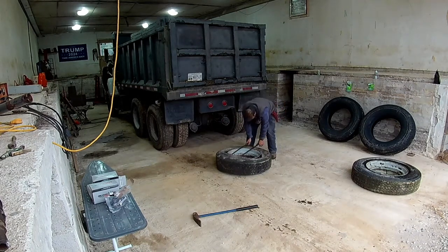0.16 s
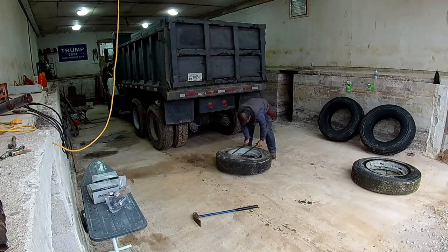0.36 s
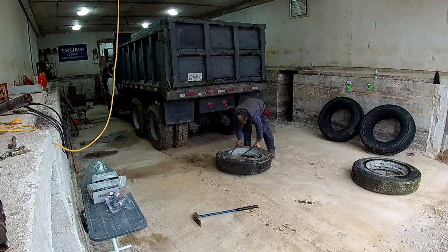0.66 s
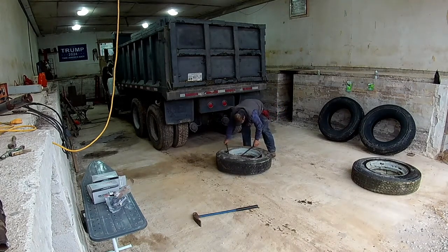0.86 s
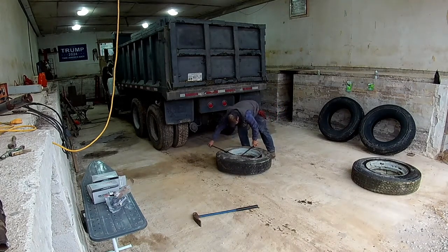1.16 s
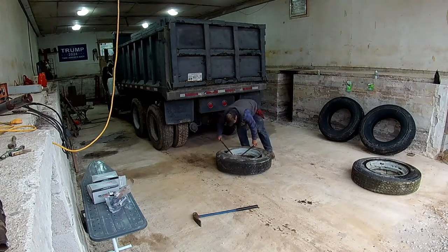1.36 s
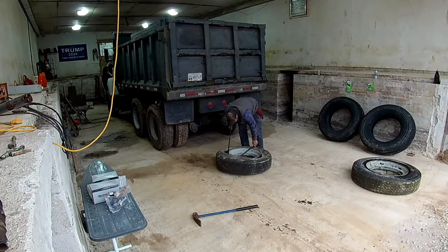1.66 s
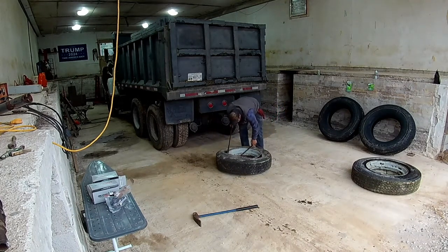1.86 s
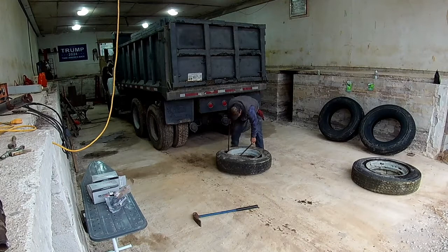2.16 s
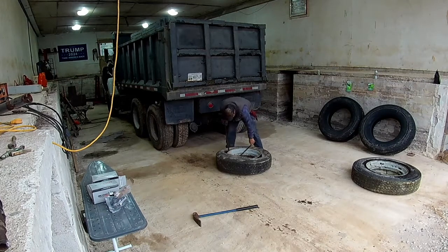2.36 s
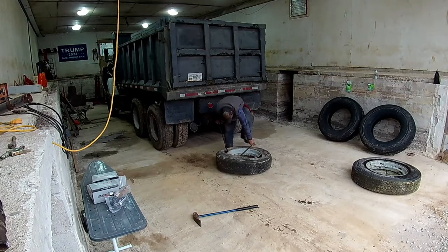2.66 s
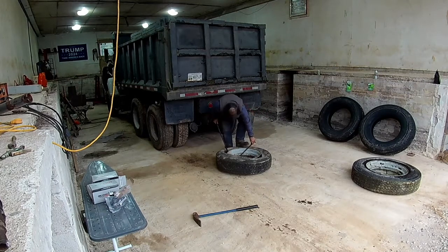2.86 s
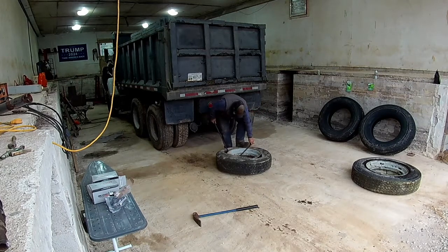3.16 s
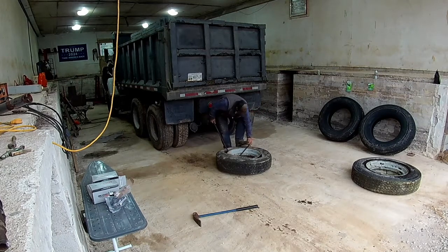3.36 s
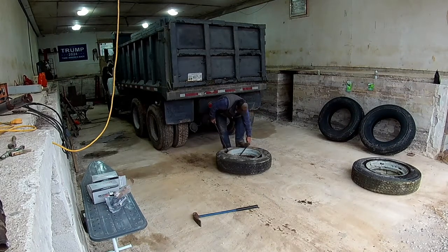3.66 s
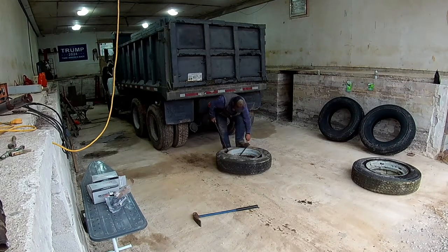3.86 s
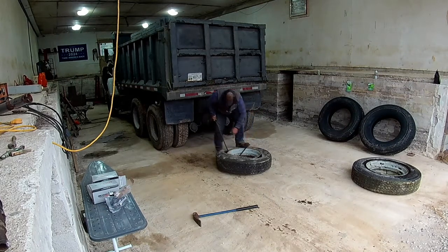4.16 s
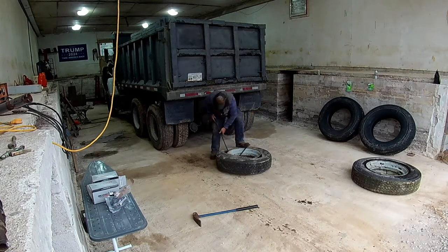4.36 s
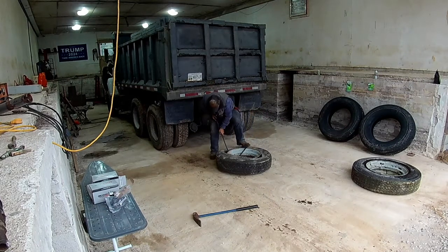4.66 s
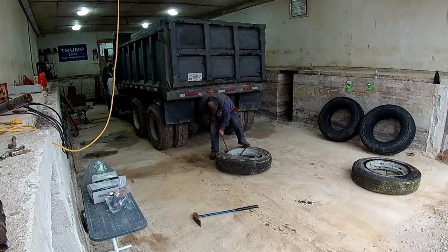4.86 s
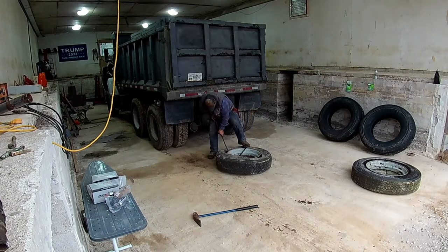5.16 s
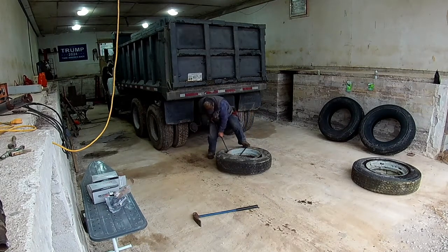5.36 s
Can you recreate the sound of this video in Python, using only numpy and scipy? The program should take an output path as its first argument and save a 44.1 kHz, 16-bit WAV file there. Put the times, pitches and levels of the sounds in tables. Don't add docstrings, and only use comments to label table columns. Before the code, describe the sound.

A large, hard-walled workshop heard from a distance, with steady low rumble and slight hiss. Soft, dull tire thumps come in the first 0.3 seconds. At about 0.7 a hard steel clank on the rim edge rings out with a wavering metallic tone and a drum-like tire boom. Around 1.05 a loose iron clinks lightly, at 1.3 it slips with a small knock, and at 1.55 it falls to the concrete with a bright double clatter and thud. A damped, hand-held iron clanks at 2.4, low soft bumps and a scuff pass near 2.8, and a faint tap comes at 3.2. At 3.6 the wheel's well is struck, a fuller hollow clank with a humming tail. Only a weak bump and faint creaking follow at 4.3, then near quiet until a heavy, deep thud with a short muted rim ring at 5.3, fading into the bay.

```python
import sys
import numpy as np
from scipy import signal
from scipy.fft import rfft, irfft
from scipy.io import wavfile
from scipy.ndimage import uniform_filter1d

SR = 44100
rng = np.random.default_rng(int(sys.argv[2]) if len(sys.argv) > 2 else 0)


def generate_wav(sig):
    pcm = np.round(np.clip(np.atleast_2d(sig).T, -1, 1) * 32767).astype(np.int16)
    wavfile.write(sys.argv[1], SR, pcm)


def gain_from_db(level_db):
    decades = np.asarray(level_db, float) / 20
    return 10 ** decades


N = 243873

# start_s, level_db, weight_db (lows), hardness_db (highs), length_s
CRACKS = [(0.0, -57, 8, -5, 0.027), (0.164, -47.5, 15, -14.5, 0.033), (0.662, -12, -9, -34, 0.0099),
          (0.676, -14.5, -12.5, -34.5, 0.017), (1.027, -39, -25, -16.5, 0.062),
          (1.057, -28, -10, -18, 0.011), (1.262, -30, -4, -53, 0.011), (1.54, -16.5, -7.5, -36, 0.0053),
          (1.556, -17.5, -7, -18, 0.0093), (2.421, -25.5, -15, -23.5, 0.01),
          (3.181, -50.5, -7.5, -17.5, 0.042), (3.577, -16, -12.5, -55, 0.011),
          (4.304, -43, -1.5, -59, 0.056), (5.331, -30.5, -1, -22.5, 0.034)]
# start_s, peak_db, drum_pitch_hz, side_wall_knock_db
THUDS = [(0.073, -56, 71, -31), (0.105, -30, 71.5, -44.5), (0.164, -28.5, 165, -25), (0.191, -20, 128, -41),
         (0.292, -57.5, 132, -42.5), (0.663, -22, 139.1, -24.5), (1.002, -40, 115, -29),
         (1.033, -31, 112, -27), (1.073, -34, 171.8, -33), (1.174, -44.5, 170.5, -69),
         (1.544, -20.5, 127, -15.5), (1.582, -20, 180, -66), (1.86, -49.5, 128, -47),
         (2.279, -44.5, 115, -36.5), (2.746, -35.5, 100.7, -36.5), (2.84, -40.5, 90.4, -42),
         (2.897, -39.5, 141, -56), (2.922, -48, 125, -73), (3.192, -45, 130, -42),
         (3.583, -33.5, 130, -50.5), (3.6, -38.5, 194.4, -62.5), (4.309, -64, 130, -26.5),
         (4.848, -45, 99, -68), (5.337, -15, 105, -31), (5.359, -23, 111, -46), (5.449, -49, 85, -61)]
# time_s, effort_db
EFFORT = [(0.0, -57), (0.25, -57.5), (0.42, -66.5), (0.71, -66.5), (0.86, -52), (1.4, -57), (1.71, -51),
          (1.92, -59.5), (2.29, -68.5), (2.48, -62.5), (3.14, -66.5), (3.62, -65), (3.76, -57.5),
          (3.94, -61), (5.33, -65.5), (5.53, -60)]
# pitch_hz, level_db, t60_s (as heard in the bay)
EDGE = [(457.8, -38.5, 0.42), (474, -38, 1.6), (589.7, 2.5, 0.5), (706, -14, 0.46), (830, -13, 0.59),
        (922, 2, 1.7), (1015, 9.5, 0.76), (1152, 5.5, 2), (1550, -36, 0.36), (1440, -31, 1.8),
        (1840, -18, 0.2), (1650, -2, 0.34), (1750, -35.5, 0.38), (2020, -5, 2.0), (2192, -8.5, 2.9),
        (2400, -32.5, 0.12), (2708, -44, 0.77), (3180, -51, 0.44), (3400, -27, 0.43), (3670, -10, 0.19),
        (3860, -16.5, 0.28), (4360, -31, 0.34), (4900, -35, 0.32), (5900, -34.5, 0.19)]
# pitch_hz, level_db, t60_s
WELL = [(549.6, 9.5, 0.35), (721, 8.5, 0.34), (782, 5, 0.72), (910, 1, 0.3), (917.6, 15.5, 0.39),
        (986, -6, 1.7), (1108, 5.5, 0.5), (1447, -31, 2.5), (1580, -9.5, 0.17), (1510, -1, 0.56),
        (1660, -17.5, 5.0), (1760, -1, 0.8), (2100, -16, 1.4), (2020, -14, 0.63), (2100, -7, 2.1),
        (2320, -15, 0.52), (2640, -19, 0.39), (3570, -18.5, 0.51)]
# pitch_hz, level_db, t60_s
LOOSE_IRON = [(900, -9, 1), (1070, 0.5, 1), (1120, 10.5, 0.26), (1430, 1, 0.71), (2000, -20.5, .8),
              (2340, -4, 0.75), (2900, -19, 0.21), (3510, -13.5, 0.76), (3966, 3, 0.35), (4600, -24, 0.61),
              (4885, 4, 0.37), (5450, -36, 0.28), (5700, -20, 0.87), (6150, -15, 0.18), (7000, -16, 0.65),
              (7585, -30, .2), (9430, -30.5, 0.48)]
# pitch_hz, level_db, t60_s
FALLEN_IRON = [(1002, 11, 0.51), (1194, 7, 0.47), (1480, 17, 0.15), (1687, -5, 0.68), (2130, -17, 0.53),
               (2530, -19, 0.31), (2700, -11.5, 0.14), (2675, -3, 0.78), (3120, -9.5, 0.8), (3470, -4, 0.6),
               (3930, -28, 0.53), (4240, -8, 0.64), (4530, -9, 0.48), (4730, -15, 0.67), (4800, -7.5, 0.44),
               (5100, -15.5, 0.72), (5850, -15, 0.74), (5870, -14, 1), (6500, -21, 0.47),
               (7060, -17.5, 0.58), (7560, -27, 0.29), (8600, -22, 0.17), (9360, -26, 0.19)]
# pitch_hz, level_db, t60_s
HELD_IRON = [(577, 14, 0.12), (872, 0.5, 0.55), (1044, -3.5, 1), (1150, -16, 1.4), (1365, 3, 0.32),
             (1508, -9, 0.78), (1550, -20, 0.19), (2089, -56, 2.6), (2263, -8, 0.35), (2830, -11, 0.5),
             (2570, -5.5, 0.48), (3500, -23, 0.42), (3330, -23, 0.27), (3440, -27.5, 2.2),
             (4100, -34, 0.52), (4200, -22, 0.37), (4500, -18.5, 0.46)]
# pitch_hz, level_db, t60_s
STAMPED_RIM = [(437, -2, 0.16), (613.5, -6, 0.35), (807, 1, 0.48), (886, 6, 0.19), (1154, -1, 0.62),
               (1650, -21, 0.16), (2005, -9.5, 0.57), (2680, -22, 1), (3590, -12.5, 0.52),
               (4312, -15.5, 0.36), (4500, -16.5, 0.58), (5360, -21.5, 0.41), (6438, -28, 0.25),
               (7650, -30, 0.091)]
# pitch_hz, level_db, t60_s
TAP = [(550, 6.5, 0.3), (930, -10, 0.73), (920, -6.5, 4.7), (2120, -7, 0.31), (2620, -15.5, 0.52),
       (2690, -26.5, 1.4), (3230, -23, 0.56), (3620, -27.5, 0.94), (3840, -32.5, 1.7), (4110, -31, 1.5)]
# pitch_hz, level_db, t60_s
SLIP = [(543, 10, 0.32), (716, -10, 0.12), (966, 4.5, 0.91), (1264, 6.5, 0.37), (1440, -16, 1.7),
        (1750, -12, 0.18), (2330, -31, 1.1), (2800, -32, 1.4)]


def steel():
    # (start_s, level_db)
    struck_places = [(EDGE, 31, [(0.663, -52.5), (0.695, -56.5)]), (WELL, 31.2, [(3.578, -52),
                     (3.59, -55.5), (4.305, -88)]), (LOOSE_IRON, 11.8, [(1.058, -60), (1.53, -72)]),
                     (FALLEN_IRON, 16.9, [(1.546, -54), (1.558, -54.5)]), (SLIP, 14, [(1.26, -67)]),
                     (HELD_IRON, 22.3, [(2.425, -55.5), (2.438, -57.5)]), (TAP, 18, [(3.182, -72.5)]),
                     (STAMPED_RIM, 53, [(5.326, -71), (5.335, -59)])]
    spread_grows = 0.32
    rise_s, free_ring = 0.0038, 0.58
    twin_places = np.array([-2.5, -1, 0, 0.48, 1.56])
    twin_gains = [0.49, 0.73, 0.94, 0.5, 0.4]
    out, t = np.zeros(N), np.arange(SR * 3 // 4) / SR
    attack = 1 - np.exp(-t / rise_s)
    for modes, spread_hz, blows in struck_places:
        top_db = max(db for hz, db, t60 in modes)
        for start_s, blow_db in blows:
            for (hz, db, t60), chance in zip(modes, rng.standard_normal((30, 50))):
                mode_spread_hz = spread_hz * (hz / 1500) ** spread_grows
                twins_hz = hz + mode_spread_hz * (twin_places + 0.298 * chance[:5])
                phases = 2 * np.pi * np.outer(t, twins_hz) + 2 * chance[5:10]
                beat = np.sin(phases) @ twin_gains
                waver_db = 4 * np.interp(t * 52, np.arange(40), chance[10:])
                fall_db = 60 * t / (free_ring * np.clip(t60, 0.05, 1.3))
                level_db = blow_db + 14.5 + db - top_db + waver_db - fall_db
                add(out, start_s, gain_from_db(level_db) * attack * beat)
    return out


def cracks():
    rise_s = 0.0019
    out, t = np.zeros(N), np.arange(9000) / SR
    for start_s, level_db, weight_db, hard_db, length_s in CRACKS:
        length_s = np.clip(length_s, 0.003, 0.06)
        envelope = np.exp(-t / length_s) * (1 - np.exp(-t / rise_s))
        burst = rng.standard_normal((2, len(t))) * envelope
        low = gain_from_db(weight_db + 10.0) * steep(burst[0], 192, 640)
        low_mid = gain_from_db(-2.0) * steep(burst[1], 728, 1536)
        high_mid = gain_from_db(0.47 * hard_db - 2.5) * steep(burst[0], 1900, 2960)
        high = gain_from_db(hard_db - 1.0) * steep(burst[1], 3110, 4400)
        add(out, start_s, gain_from_db(level_db) * (low + low_mid + high_mid + high))
    return dulled(out)


def thuds():
    out, t = np.zeros(N), np.arange(20000) / SR
    for start_s, peak_db, hz, knock_db in THUDS:
        t60 = np.interp(peak_db, [-31.5, -20], [0.18, 0.076])
        fall = gain_from_db(peak_db - 3 - 60 * t / max(t60, 0.02))
        boom = fall * np.sin(2 * np.pi * hz * t) * (1 - np.exp(-t / 0.004))
        knock = steep(rng.standard_normal(len(t)) * np.exp(-t / 0.0098), 180, 380)
        knock = knock + 0.004 * ring(knock, 311.5, 0.29)
        add(out, start_s, boom + gain_from_db(knock_db + 3.5) * knock)
    return band(out, 69, 520)


def tire_rumble():
    rumble_db, follows = -60, 0.46
    settle_db, settle_s = -29.5, 0.053
    effort_db = effort_curve()
    gain = gain_from_db(rumble_db + follows * (effort_db - effort_db.mean()))
    gain = gain + swells([(s + 0.031, 0.02, settle_s, db + settle_db) for s, db, *_ in THUDS])
    return gain * flicker(14, spread_db=2.5) * rms_one(steep(rng.standard_normal(N), 70, 200))


def rubber_creak():
    # middle_s, rise_s, fall_s, level_db
    scuff_rows = [(0.3, 0.061, 0.13, -75.5), (2.35, 0.066, 0.057, -68), (2.93, 0.047, 0.039, -62.5),
                  (4.35, 0.032, 0.05, -65)]
    after_db, after_s = -47.5, 0.087
    gain = gain_from_db(effort_curve() - 6.5) + swells(scuff_rows)
    gain = gain + swells([(s + 0.017, 0.02, after_s, db + after_db) for s, db, *_ in CRACKS])
    return gain * flicker(26, spread_db=-0.5) * rms_one(steep(rng.standard_normal(N), 210, 1370))


def iron_scrape():
    # middle_s, rise_s, fall_s, level_db
    drag_rows = [(0.0, .1, 0.093, -83.5), (1.43, 0.035, .15, -75.5), (1.56, 0.024, 0.081, -64),
                 (2.45, 0.26, .1, -83), (4.15, 0.051, 0.29, -84), (4.95, 0.047, 0.11, -84),
                 (5.34, 0.033, .1, -71.5), (1.05, .03, .08, -69.5)]
    gain = gain_from_db(-99) + swells(drag_rows)
    rough = dulled(band(rng.standard_normal(N), 1200, 7800))
    return gain * flicker(14, spread_db=4.5) * rms_one(rough)


def panel_hum():
    # middle_s, rise_s, fall_s, level_db
    hum_rows = [(0.11, 0.03, 0.05, -53.5), (0.78, .06, .08, -49.5), (1.19, .05, 0.03, -60.5),
                (1.54, .03, .04, -65), (2.4, 0.083, 0.27, -65), (3.63, 0.025, 0.043, -42.5),
                (3.85, 0.056, .3, -59), (4.5, .3, 0.092, -57.5), (5.34, .04, .03, -56)]
    hum_hz, width_hz = 139.6, 4.5
    return swells(hum_rows) * rms_one(ring(rng.standard_normal(N), hum_hz, 5.7 / width_hz))


def bay(x):
    # frequency_hz, t60_s
    bay_t60 = [(60, 0.82), (150, 0.63), (400, 0.84), (1000, 0.9), (2000, 0.74), (4000, 0.79), (8000, 0.16)]
    direct_db, build_s = 0, 0.0016
    t, edges_hz = np.arange(SR) / SR, 30 * 2 ** np.arange(0, 9.1, 0.5)
    white, tail = rng.standard_normal((2, SR)), 0
    for k, (low_hz, high_hz) in enumerate(zip(edges_hz, edges_hz[1:])):
        t60 = at_hz(bay_t60, np.sqrt(low_hz * high_hz))
        fall = gain_from_db(-60 * t / t60) * np.sqrt(14 / t60 / SR)
        tail = tail + band(white[k % 2], low_hz, high_hz) * fall
    response = tail * (1 - np.exp(-t / build_s))
    response[0] = gain_from_db(direct_db)
    return signal.fftconvolve(x, response)[:N]


def shop():
    # frequency_hz, density_db (per Hz)
    shop_spectrum = [(20, 2.5), (60, 12.5), (120, 4.5), (250, -3), (600, -4.5), (1300, -21.5),
                     (2500, -21.5), (4000, -26.5), (6000, -37.5), (7500, -35.5), (9000, -39),
                     (12000, -42.5), (16000, -43)]
    hz = np.maximum(np.fft.rfftfreq(N, 1 / SR), 10)
    spectrum = rfft(rng.standard_normal(N)) * gain_from_db(at_hz(shop_spectrum, hz))
    return gain_from_db(-63.5) * rms_one(irfft(spectrum, N))


def effort_curve():
    time_s, effort_db = np.transpose(EFFORT)
    return np.interp(np.arange(N) / SR, time_s, effort_db)


def swells(rows):
    t, total = np.arange(N) / SR, 0
    for middle_s, rise_s, fall_s, level_db in rows:
        before = (middle_s - t) / max(rise_s, 0.005)
        after = (t - middle_s) / max(fall_s, 0.005)
        total = total + gain_from_db(level_db) * np.exp(-np.where(t < middle_s, before, after))
    return total


def flicker(rate_hz, spread_db):
    knots = rng.standard_normal(400)
    return gain_from_db(spread_db * np.interp(np.arange(N) / SR * rate_hz, np.arange(400), knots))


def ring(clicks, hz, t60):
    r = gain_from_db(-60 / (max(t60, 0.01) * SR))
    w = 2 * np.pi * hz / SR
    return signal.lfilter([0, np.sin(w)], [1, -2 * r * np.cos(w), r * r], clicks + 1e-18)


def band(x, low_hz, high_hz):
    return signal.sosfilt(signal.butter(2, [low_hz, high_hz], "band", fs=SR, output="sos"), x)


def steep(x, low_hz, high_hz):
    return band(band(x, low_hz, high_hz), low_hz * 0.94, high_hz * 1.606)


def dulled(x):
    return signal.sosfilt(signal.cheby1(6, 1, 5500, fs=SR, output="sos"), x)


def rms_one(x):
    return x / np.sqrt(np.mean(x ** 2) + 1e-20)


def at_hz(points, hz):
    table_hz, values = np.transpose(points)
    return np.interp(np.log(hz), np.log(table_hz), values)


def add(out, start_s, sound):
    i = max(round(start_s * SR), 0)
    out[i:i + len(sound)] += sound[:N - i]


def scene():
    clank, boom = steel(), thuds()
    near = gain_from_db(-6) * clank + gain_from_db(-21) * boom
    room = bay(cracks() + boom + gain_from_db(-4) * clank)
    work = tire_rumble() + rubber_creak() + iron_scrape() + panel_hum()
    return (room + near + work + shop())[None]


def band_limit(x):
    return signal.sosfilt(signal.butter(12, 15720, fs=SR, output="sos"), x)


def record(dry):
    level = np.sqrt(np.abs(uniform_filter1d(dry ** 2, size=1600)))
    grit = gain_from_db(-26.5) * level ** 1.6 * band(rng.standard_normal(dry.shape), 7400, 18000)
    return band_limit(dry + grit)


dry = scene()
out = record(dry)
generate_wav(out)
```